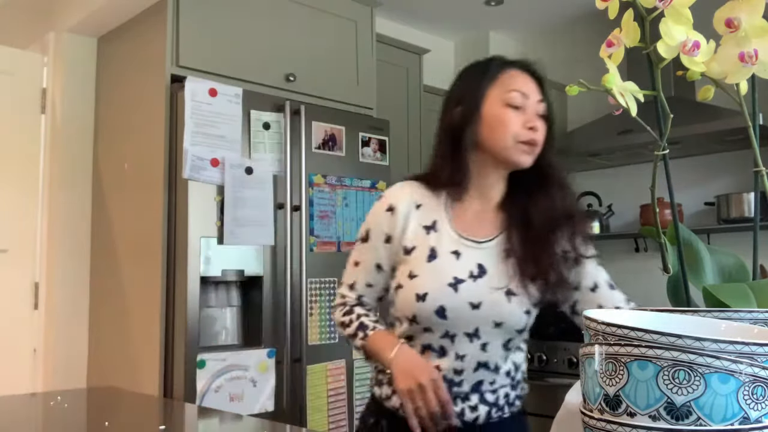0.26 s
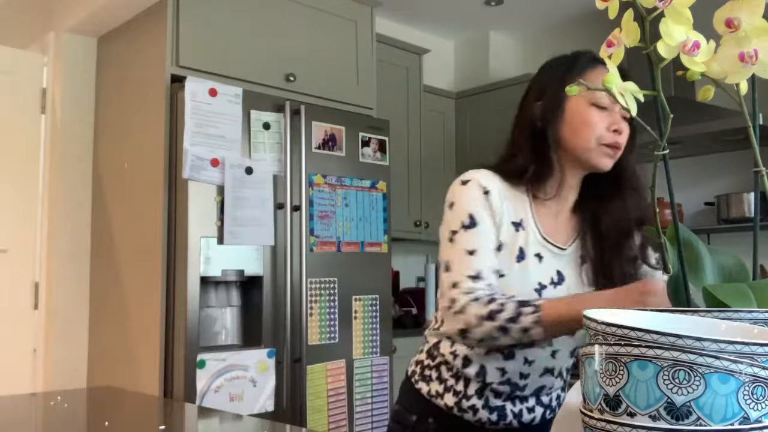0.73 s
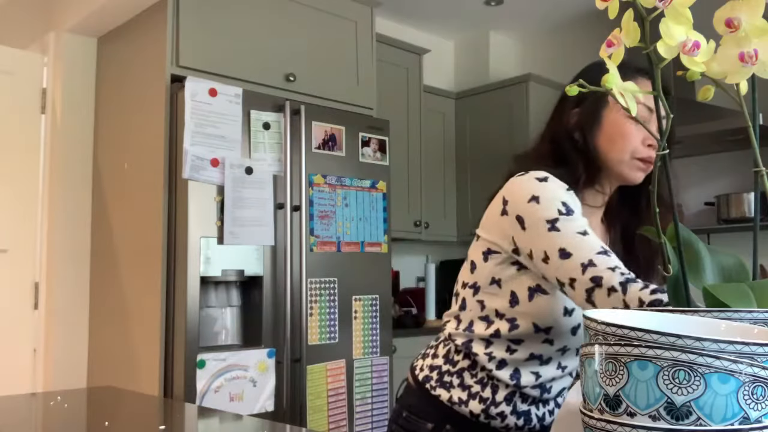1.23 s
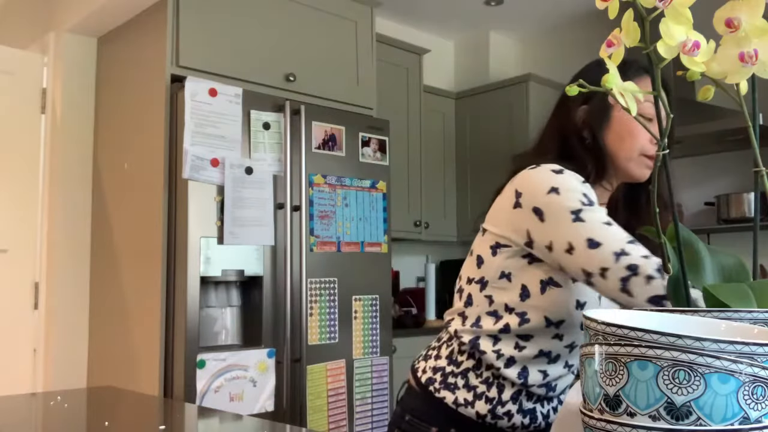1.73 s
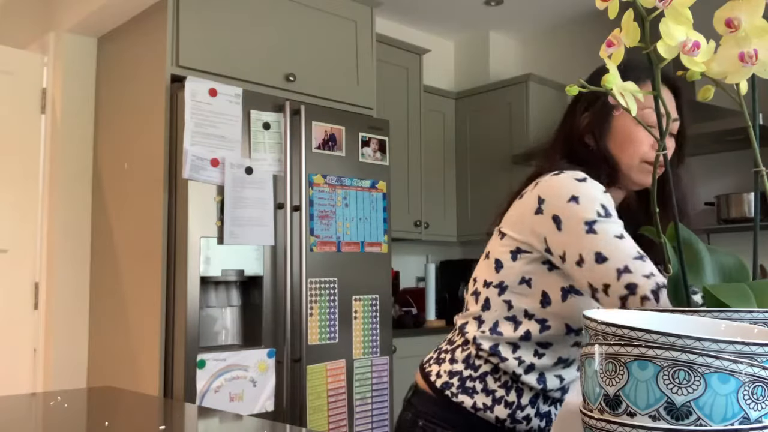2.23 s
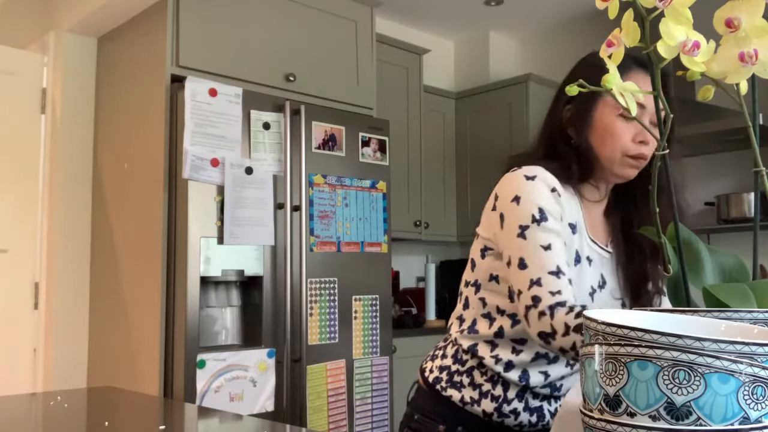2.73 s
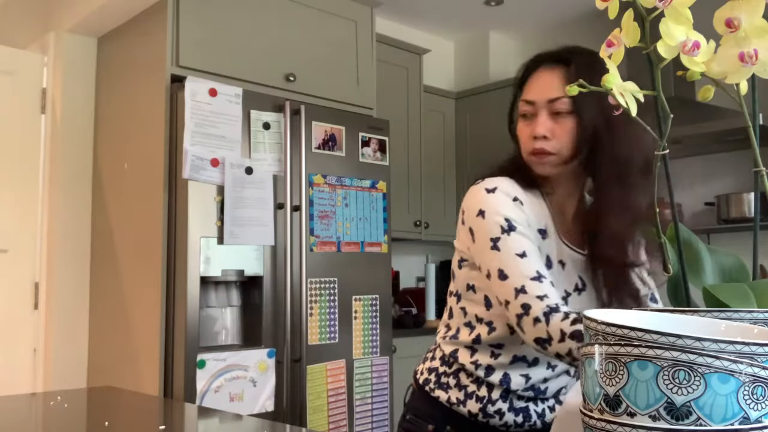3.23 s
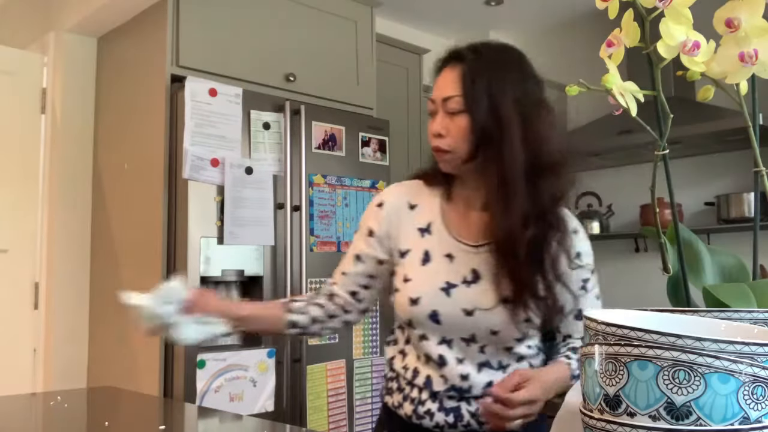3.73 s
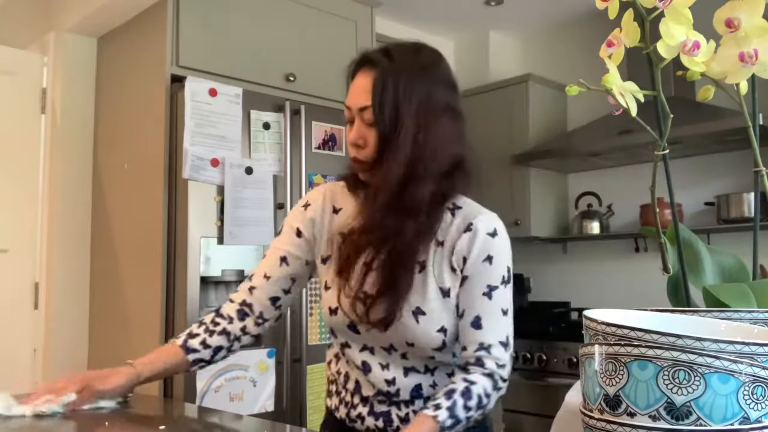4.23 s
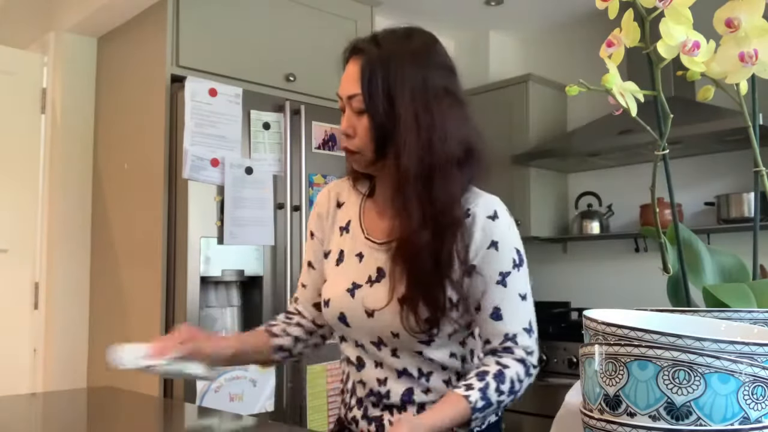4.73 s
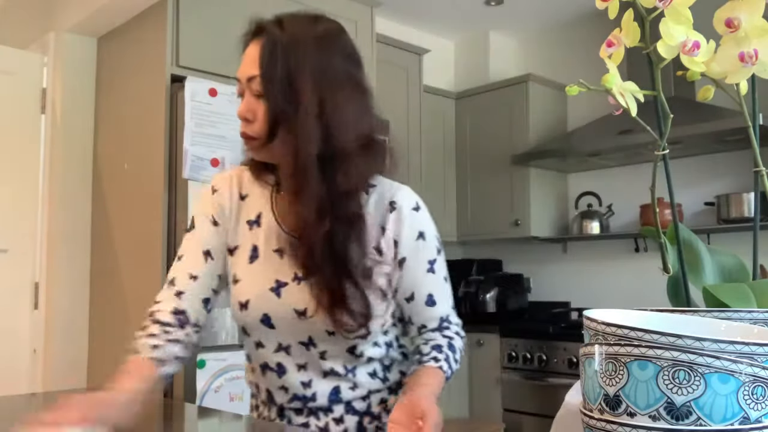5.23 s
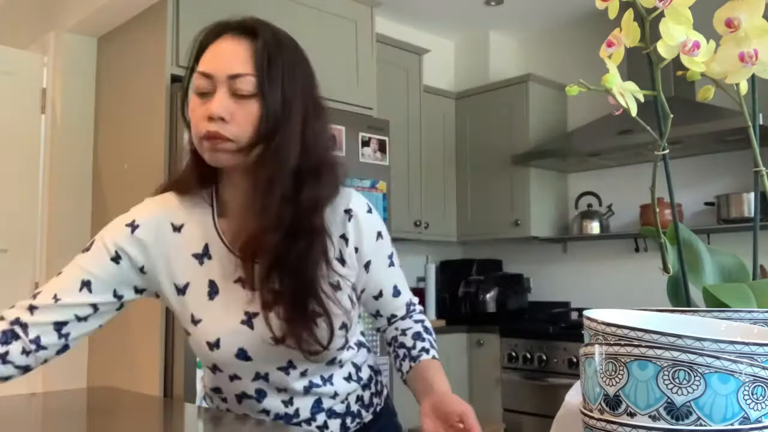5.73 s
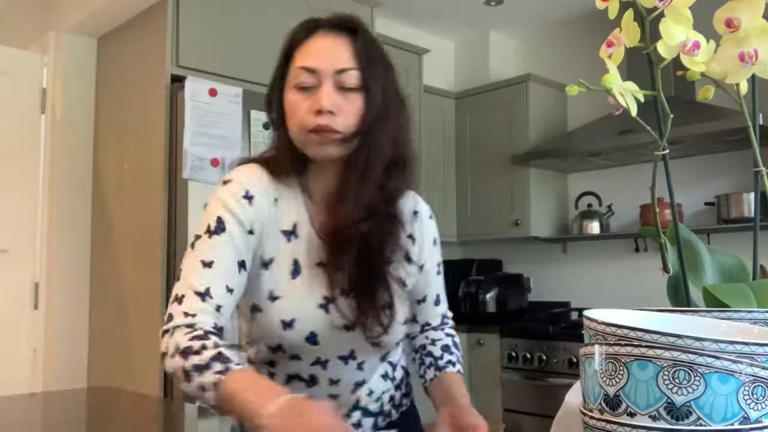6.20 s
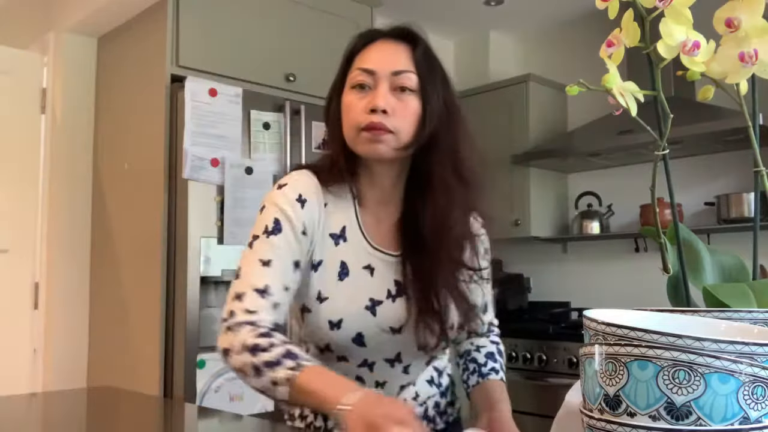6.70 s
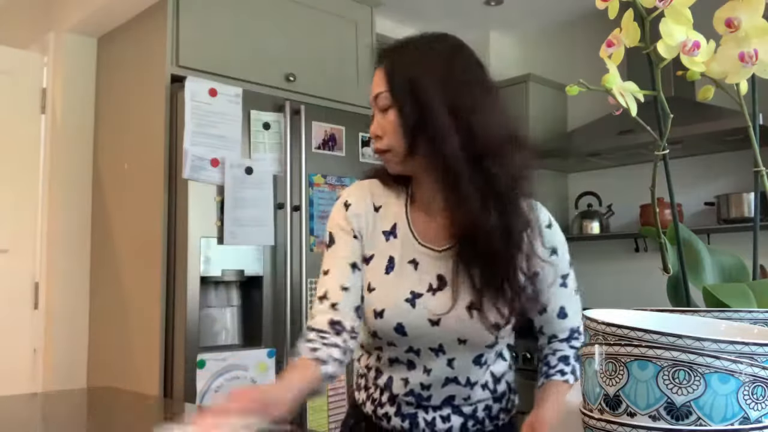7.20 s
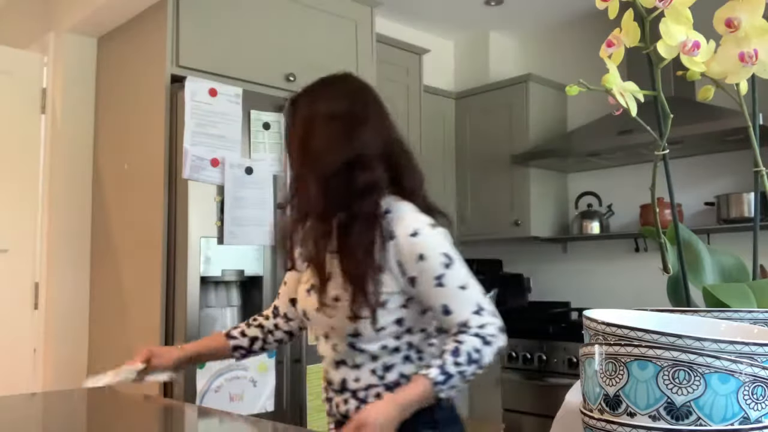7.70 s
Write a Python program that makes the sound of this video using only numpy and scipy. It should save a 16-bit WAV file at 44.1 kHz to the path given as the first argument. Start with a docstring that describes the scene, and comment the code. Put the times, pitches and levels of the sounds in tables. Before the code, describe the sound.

Rattling box knocks in a hard kitchen, a porcelain dish clanks and rings twice, then paper rustles, crunches and wipes across a worktop.

```python
"""A hard-walled kitchen, heard from a phone on the worktop, with a faint steady rush behind everything.
A box is shifted with rattling, booming knocks: noise bursts that leave clusters of close modes ringing.
A porcelain dish strikes twice and rings as a set of wavering sine partials. A hand rummages in paper,
pats a wad down and wipes it to and fro: filtered friction noise, with added snaps and crunches.
Dull taps, light clinks and deep furniture booms are short bands of noise at their own pitches."""
import sys
import numpy as np
from scipy import signal
from scipy.fft import rfft, irfft, next_fast_len
from scipy.io import wavfile
from scipy.ndimage import uniform_filter1d

SR = 44100
rng = np.random.default_rng(int(sys.argv[2]) if len(sys.argv) > 2 else 0)


def wrap_up_sound(samples):
    """Save the sound to the file named by the first command line argument, as 16-bit audio."""
    columns = np.atleast_2d(samples).T
    # keep every value between -1 and 1, then stretch to whole-number steps
    tamed = np.clip(columns, -1, 1)
    steps = np.round(tamed * 32767).astype(np.int16)
    wavfile.write(sys.argv[1], SR, steps)


N = 350574  # length of the scene in samples
T = np.arange(N) / SR  # time in seconds


def undb(db):
    """Turn decibels into a gain."""
    return 10 ** (np.asarray(db) / 20)


def unit(x):
    """Scale to an rms of 1."""
    return x / np.sqrt(np.mean(x ** 2))


def short_level(x, db):
    """Scale a short sound so that its energy, spread over 50 ms, has this rms level."""
    return x * undb(db) * np.sqrt(SR / 20 / np.sum(x ** 2))


def fade(t, t60):
    """Exponential decay that falls 60 dB in t60 seconds."""
    return np.exp(-np.log(1000) * t / t60)


def along(points, hz):
    """Read a curve of (Hz, value) points on a log-frequency axis."""
    f, value = np.transpose(points)
    return np.interp(np.log(np.maximum(hz, 1)), np.log(f), value)


def colour(x, points, size=2048):
    """Filter with the given (Hz, dB) curve, without any sound before its cause (minimum phase)."""
    log_gain = along(points, np.fft.rfftfreq(size, 1 / SR)) * np.log(10) / 20
    cepstrum = irfft(log_gain)
    # folding the cepstrum onto positive time makes the filter causal
    cepstrum[1:size // 2] *= 2
    cepstrum[size // 2 + 1:] = 0
    response = irfft(np.exp(rfft(cepstrum)))
    return signal.fftconvolve(x, response)[:len(x)]


def band(x, lo_hz, hi_hz, order=2):
    """Keep only the band between two frequencies (Butterworth)."""
    edges = [lo_hz, min(hi_hz, SR / 2 - 1)]
    return signal.sosfilt(signal.butter(order, edges, "band", fs=SR, output="sos"), x)


def walk(rate, count=N):
    """Random levels, a new one every 1 / rate seconds, smoothed twice and scaled to an rms of 1."""
    k = int(SR / rate)
    steps = np.repeat(rng.standard_normal(count // k + 1), k)
    return unit(uniform_filter1d(uniform_filter1d(steps, k), k)[:count])


def add(track, s, sound):
    """Mix a sound into a track at s seconds."""
    i = int(s * SR)
    track[..., i:i + sound.shape[-1]] += sound[..., :N - i]


def slips(count, spread_db):
    """Dense tiny clicks of either sign: most are faint, a few runs of 16 samples stand out."""
    run_db = spread_db * np.minimum(rng.exponential(size=count // 16 + 1), 5)
    sizes = np.repeat(undb(run_db), 16)
    return unit(rng.standard_normal(count) * sizes[:count])


def touch(thump_db, crisp_db, thump_hz=500, crisp_hz=7500):
    """Colour of one contact as (Hz, dB): soft ones thump, hard ones crack."""
    return [(thump_hz, thump_db), (2 * thump_hz, 0), (crisp_hz / 2, 0), (crisp_hz, crisp_db)]


def blow(db, thump_db, crisp_db, decay_s, spectrum, rise_s, spread_db):
    """A short shower of tiny contacts, coloured by the touch and by what is touched."""
    t = T[:SR // 4]
    shower = slips(len(t), spread_db) * (1 - np.exp(-t / rise_s)) ** 2 * np.exp(-t / decay_s)
    shower = colour(colour(shower, touch(thump_db, crisp_db)), spectrum)
    return short_level(shower, db)


# How wide the sound is. Each row: frequency in Hz, side minus mid in dB.
STEREO_WIDTH = [(100, -5.5), (250, -5), (500, 2), (1000, 2.5), (2500, 2.5), (6000, 3.5), (11000, -1)]
# How the sound leans between the ears. Each row: frequency in Hz, left minus right in dB.
LEFT_RIGHT_BALANCE = [(100, 1), (350, 2.5), (850, -1), (1800, -1.5), (3500, -0.5), (6500, 2.5),
                      (12000, 1.5)]


def microphones(mid, side):
    """Two close ports: more alike in the bass than higher up. Returns left and right."""
    side = colour(side, STEREO_WIDTH)
    channels = []
    for sign in (1, -1):
        lean = [(hz, sign * db / 2) for hz, db in LEFT_RIGHT_BALANCE]
        channels.append(colour(mid + sign * side, lean))
    return np.array(channels)


# How long the room rings. Each row: frequency in Hz, time to fall 60 dB in seconds.
ROOM_DECAY = [(100, 0.63), (400, 0.31), (1500, 0.5), (5000, 0.52), (9000, 0.44), (15000, 0.35)]


def kitchen(x, direct_db, gap_s):
    """Direct sound plus dense reflections that build up over gap_s and decay band by band."""
    t = T[:SR * 3 // 4]
    edges = np.geomspace(40, 20000, 10)
    hz = np.fft.rfftfreq(len(t), 1 / SR)
    noise = rfft(rng.standard_normal((2, len(t))))
    tail = 0
    for lo, hi in zip(edges, edges[1:]):
        t60 = along(ROOM_DECAY, np.sqrt(lo * hi))
        tail = tail + irfft(noise * (hz >= lo) * (hz < hi), len(t)) * fade(t, t60)
    response = unit(tail * (1 - np.exp(-t / gap_s))) / np.sqrt(len(t))
    response[0, 0] += undb(direct_db)  # the direct sound goes to the mid only
    mid, side = signal.fftconvolve(x[None], response, axes=1)[:, :N] / np.hypot(1, undb(direct_db))
    return microphones(mid, side)


# Colour of the quiet kitchen. Each row: frequency in Hz, level in dB.
ROOM_TONE_COLOUR = [(15, -32.5), (25, -2.5), (69, 2), (144, -9), (289, -9), (567, -24), (1140, -16.5),
                    (5140, -29), (6210, -24.5), (7300, -29), (11200, -27.5), (13900, -35.5), (15500, -45)]


def room_tone():
    """The faint steady rush of the kitchen: coloured noise, drawn separately for mid and side."""
    mid, side = (unit(colour(rng.standard_normal(N), ROOM_TONE_COLOUR)) for _ in range(2))
    return microphones(mid, side) * undb(-67.5)


# Heavier contacts that make the furniture boom. Each row: start in seconds, level in dB before the room.
FURNITURE_BOOMS = [(.17, -51.5), (.277, -50), (.64, -56), (1.103, -61.5), (2.054, -55), (2.306, -50),
                   (3.9, -56), (6.468, -57)]


def booms():
    """The deep, short resonance of the furniture under a heavy contact: a narrow band of noise."""
    boom_hz, width_hz, decay_s = 67.6, 15, .03
    out, t = np.zeros(N), T[:SR // 3]
    for s, db in FURNITURE_BOOMS:
        burst = rng.standard_normal(len(t)) * np.exp(-t / decay_s)
        boom = band(burst, boom_hz - width_hz / 2, boom_hz + width_hz / 2)
        add(out, s, short_level(boom, db))
    return kitchen(out, direct_db=7.5, gap_s=.002)


# Dull taps of the hand and of things it nudges.
# Each row: start in seconds, level in dB before the room, pitch in Hz.
DULL_TAPS = [(1.107, -55.5, 430), (1.643, -63, 1140), (2.312, -45.5, 706), (2.785, -44, 800),
             (2.857, -44, 820), (3.352, -50, 390), (4.19, -49, 865), (4.523, -54, 282), (5.523, -60, 350),
             (5.679, -52.5, 1420), (6.468, -41.5, 398), (6.488, -41.5, 920), (6.598, -52, 700),
             (6.65, -50, 540), (7.15, -61, 876), (7.19, -59.5, 780), (7.654, -54.5, 150)]


def taps(decay_s, spread):
    """Soft contacts: a short thud of noise about one pitch."""
    out, t = np.zeros(N), T[:SR // 8]
    for s, db, hz in DULL_TAPS:
        burst = rng.standard_normal(len(t)) * np.exp(-t / decay_s)
        thud = band(burst, hz / (1 + spread), hz * (1 + spread))
        add(out, s, short_level(thud, db))
    return kitchen(out, direct_db=2.0, gap_s=0.0018)


# Wrapped crockery touches lightly and rings on one muffled note.
# Each row: start in seconds, level in dB before decay and room, pitch in Hz.
CROCKERY_CLINKS = [(.994, -57, 1190), (1.525, -64.5, 2363), (1.642, -58, 1163), (1.778, -67, 1220)]


def clinks(width_hz, t60):
    """Light touches of crockery: a tight cluster about one pitch, soon damped by the paper."""
    out, t = np.zeros(N), T[:SR // 2]
    for s, db, hz in CROCKERY_CLINKS:
        cluster = unit(band(rng.standard_normal(len(t)), hz - width_hz / 2, hz + width_hz / 2))
        add(out, s, cluster * fade(t, t60) * undb(db))
    return kitchen(out, direct_db=7.5, gap_s=0.0025)


# Knocks on the box. Each row: start in seconds, level in dB before the final mix, thump in dB,
# crispness in dB, decay time in seconds, rattle over the level in dB.
BOX_KNOCKS = [(0.167, -30, 4.5, -2.5, 0.025, -13), (0.2743, -23, 1, -3, 0.0037, -4),
              (0.2797, -24.5, 2.5, 4.5, .003, -7), (0.3555, -25, 5, 0.5, 0.002, -2.5),
              (.408, -29, 1.5, -3, 0.0034, 1.5), (.446, -29.5, -3.5, -11.5, 0.005, -10),
              (1.104, -58, 10, -14, 0.0064, -20)]
# Colour of a knock on the box. Each row: frequency in Hz, level in dB.
BOX_COLOUR = [(29, -33.5), (50, -12.5), (290, -14), (434, -2), (800, -11), (1100, -8.5), (1740, -20),
              (2220, -11.5), (2500, -14.5), (5140, -15), (7190, -14.5), (10800, -13), (15500, -21.5)]
# What the box and its loose contents ring with. Each row: frequency in Hz, width in Hz,
# level over the rattle in dB, time to fall 60 dB in seconds.
BOX_RINGS = [(429, 38, -10.5, 0.42), (540, 110, -19.5, 0.22), (725, 130, -12, 0.19), (900, 60, -15.5, 0.24),
             (1032, 66, -10.5, 0.79), (1287, 50, -11, 0.38), (2198, 87, -5, 0.41), (2480, 78, -14, .3),
             (8270, 290, -4.5, 0.31), (11030, 600, 2.5, 0.39), (13800, 700, -9.5, .3)]


def box():
    """Knocks shake the box; its walls and loose contents ring on in clusters of close modes."""
    knocks, rings, t = np.zeros(N), np.zeros((2, N)), T[:SR * 3 // 4]
    for s, db, thump_db, crisp_db, decay_s, rattle_db in BOX_KNOCKS:
        add(knocks, s, blow(db, thump_db, crisp_db, decay_s, BOX_COLOUR, rise_s=0.0016, spread_db=2.0))
        for hz, width, mode_db, t60 in BOX_RINGS:
            lo, hi = hz - width / 2, hz + width / 2
            cluster = np.array([unit(band(rng.standard_normal(len(t)), lo, hi)) for _ in rings])
            # each touch colours the ringing too
            ring_db = db + rattle_db + mode_db + along(touch(thump_db, crisp_db), hz)
            add(rings, s, cluster * fade(t, t60) * undb(ring_db))
    knocks = colour(knocks, [(110, -6.5), (320, -1.5)])  # the box radiates little deep bass
    knocks = kitchen(knocks, direct_db=-2.0, gap_s=0.0028)
    return knocks * undb(1) + microphones(*rings) * undb(-2.0)


# The ringing notes of the dish. Each row: frequency in Hz, level in dB before wavering and mix,
# time to fall 60 dB in seconds, second blow over the first in dB, side minus mid in dB.
DISH_PARTIALS = [(1797, -34, .68, 2, 1), (1863, -38, .58, -2, 1), (2091, -24, .5, -1, 8),
                 (2943, -35, .38, 4, 4), (3051, -23.5, .41, 8, 2), (4485, -35, .46, 0, 1),
                 (4570, -28.5, .46, 4, 0), (5681, -13.5, .31, 12, -7), (6097, -23, .41, 6, -9),
                 (6739, -30, .38, -8, -2), (7203, -23, .36, 0, 6), (7295, -20.5, .36, 2, 6),
                 (7360, -31, .34, 0, 6), (8687, -32.5, .3, 0, 2), (9114, -34.5, .28, 4, 3),
                 (9962, -23, .31, -7, -3), (10490, -36, .3, -5, -3), (10660, -38, .28, -6, -3),
                 (11400, -37, .22, -4, -15), (11602, -35, .23, -2, -15), (13311, -29, .21, -10, -4),
                 (13396, -29.5, .21, -10, -4), (14930, -32, .27, -10, 9), (15110, -33, .28, -10, 9)]
# The dish bumps on the worktop; the first two bumps make it ring. Each row: start in seconds,
# level in dB before the final mix, thump in dB, crispness in dB, decay time in seconds.
DISH_BUMPS = [(2.052, -20, -5.5, -9, 0.01), (2.099, -23.5, -8.5, -4, 0.0019),
              (2.306, -40, 16, -12.5, 0.0036), (2.391, -51, 19, -13, 0.0092)]
# Colour of a bump on the worktop. Each row: frequency in Hz, level in dB.
WORKTOP_COLOUR = [(25, -33.5), (70, -9.5), (170, -10.5), (340, 0.5), (520, -2), (650, -0.5), (1050, -2),
                  (1500, -11.5), (2200, -7.5), (4000, -6.5), (5000, -8.5), (7000, -2.5), (10300, -8),
                  (11200, -30.5), (15500, -37)]


def dish(swell_s, sway_db, sway_rate, waver_db, waver_rate, linger_db, linger_t60):
    """Porcelain struck twice: partials build up in the room, waver with its reflections, and linger."""
    level_db, left_db, wander_rad = 3, 2.5, .3  # left_db is left over right
    ring, bumps, t = np.zeros((2, N)), np.zeros(N), T[:SR]
    start = DISH_BUMPS[0][0]
    ages = [np.maximum(t - (s - start), 0) for s, *_ in DISH_BUMPS[:2]]
    for hz, db, t60, second_db, side_db in DISH_PARTIALS:
        swells = []
        for age in ages:
            decay = undb(-60 * age / t60)
            linger = undb(linger_db - 60 * age / linger_t60)
            swells.append((1 - np.exp(-age / swell_s)) * np.hypot(decay, linger))
        first, second = swells
        envelope = np.hypot(first, undb(second_db) * second)
        envelope = envelope / envelope.max() * undb(db) / np.hypot(1, undb(side_db))
        # each partial swells and sinks irregularly, independently of the others
        envelope = envelope * undb(sway_db * np.tanh(walk(sway_rate, len(t))))
        phase = 2 * np.pi * (hz * t + rng.random())
        # mid and side lie about a quarter turn apart, so each partial sounds wide
        for track, gain, turn in zip(ring, (1, undb(side_db)), (0, np.pi / 2)):
            wave = np.sin(phase + turn + wander_rad * walk(waver_rate, len(t)))
            waver = undb(waver_db * np.tanh(walk(waver_rate, len(t))))
            add(track, start, gain * envelope * waver * wave)
    for s, *stroke in DISH_BUMPS:
        add(bumps, s, blow(*stroke, WORKTOP_COLOUR, rise_s=0.00099, spread_db=0.0))
    mid, side = ring
    left = (mid + side) * undb(level_db + left_db / 2)
    right = (mid - side) * undb(level_db - left_db / 2)
    return np.array([left, right]) + kitchen(bumps, direct_db=-5.5, gap_s=0.0027) * undb(-3)


# The hand rummages in the packing paper. Each row: start in seconds, length before the release in
# seconds, level in dB before colour and room, weight (rumble over level) in dB,
# crispness (hiss over level) in dB.
PAPER_RUMMAGES = [(0, 0.0089, -50, -15, -24), (0.603, 0.11, -48.5, -1, -6.5),
                  (0.726, 0.1, -55.5, -28, -4.5), (0.916, 0.16, -64, -6.5, -3.5),
                  (1.109, 0.064, -54.5, -0.5, -11.5), (1.21, 0.086, -63.5, -25, -13),
                  (1.48, .17, -76.5, 0, -1), (1.75, 0.048, -75.5, -3, 7), (2.36, 0.36, -48, 0.5, -6),
                  (2.709, 0.15, -45, -7, -4.5), (2.961, 0.22, -46.5, -3.5, -4.5),
                  (3.225, 0.1, -46.5, -15, -3.5), (3.311, 0.15, -51, -6.5, -1),
                  (3.516, 0.57, -61.5, -12.5, -3)]
# The wad is wiped over the worktop, one row a sweep. Each row: start in seconds, length before the
# release in seconds, level in dB before colour and room, weight in dB, crispness in dB.
WAD_WIPES = [(3.875, 0.22, -45.5, -8, -1), (4.11, 0.31, -48, -13, -4), (4.362, 0.064, -40, -20, -5.5),
             (4.462, 0.064, -49, -1, -1.5), (4.56, 0.24, -61, -29, -6.5), (4.765, 0.11, -55, -10.5, 2.5),
             (4.826, 0.18, -51, -8, -7.5), (5.038, 0.18, -47.5, -44, 3), (5.21, 0.11, -52.5, -30, 0.5),
             (5.344, 0.32, -56.5, -5, -0.5), (5.67, 0.31, -55, -36, 3), (5.952, 0.14, -56, -7, 1),
             (6.106, 0.18, -51, -19, -2.5), (6.3, 0.14, -55, -17, 2.5), (6.554, 0.17, -51.5, 2, 1.5),
             (6.708, 0.25, -56, -12.5, 2), (6.998, 0.14, -57.5, -12.5, 2.5), (7.106, 0.14, -53, -12, 3),
             (7.23, 0.16, -64.5, -13, 8.5), (7.413, 0.17, -55.5, -40, 4.5), (7.588, 0.07, -49, -8, -6),
             (7.792, 0.091, -53, -39, -8.5)]


def strokes():
    """Each move of the hand swells, holds and dies away. Returns rumble, rasp and hiss in dB."""
    attack_s, release_s = 0.05, .035  # the hand speeds up, holds, then slides to rest
    sag_db_per_s = 0.5  # the paper flattens under the hand and quietens
    power = np.full((3, N), 1e-10)
    age = T[:SR]
    for s, length_s, db, weight_db, crisp_db in PAPER_RUMMAGES + WAD_WIPES:
        swell = np.sin(np.pi / 2 * np.minimum(age / attack_s, 1))
        speed = swell * np.exp(-np.maximum(age - length_s, 0) / release_s)
        gains = undb(db + np.array([weight_db, 0, crisp_db]))
        add(power, s, np.outer(gains, speed * undb(-sag_db_per_s * age)) ** 2)
    return 10 * np.log10(power)


def crinkles(rasp_db, rate, lo_hz, hi_hz, cycles, spread_db):
    """Single creases snap at random moments, each ringing a few cycles at its own pitch."""
    out, t = np.zeros(N), T[:SR // 50]
    for when, pitch, size in rng.random((int(rate * N / SR), 3)):
        hz = lo_hz * (hi_hz / lo_hz) ** pitch
        snap = np.sin(2 * np.pi * hz * t) * np.exp(-hz * t / cycles)
        # a snap is as loud as the hand's rasp at that moment, plus a random extra
        add(out, when * N / SR, snap * undb(rasp_db[int(when * N)] + spread_db * size ** 2))
    return out


# Colour of rubbed paper. Each row: frequency in Hz, level in dB.
RUBBED_PAPER_COLOUR = [(70, 8), (110, 5), (170, 17), (270, 15.5), (400, 16), (680, 10), (1050, 11),
                       (2000, 8), (4000, 3.5), (6000, 2.5), (9000, 2.5), (13000, 5), (15000, -10.5)]
# The wad is pressed or snatched and its creases buckle; the first row is a brief hissing rustle of the sleeve.
# # Each row: start in seconds, level in dB before the final mix, thump in dB, crispness in dB, decay time in
# seconds.
WAD_CRUNCHES = [(.919, -64.5, -19, 23, 0.0067), (2.789, -43, 3, 3, 0.0059), (2.857, -46.5, 5, 3, 0.0085),
                (3.03, -51, 10, -3, .015), (3.252, -51.5, 14, 2, 0.024), (3.351, -53.5, 22, 3, 0.011),
                (3.642, -62, -11, 24, 0.017), (3.785, -65, -7, 7, .004), (3.885, -49.5, 16, -7, 0.0094),
                (3.913, -42, 3, 2, 0.017), (3.939, -41.5, 3.5, -5, 0.011), (4.028, -40, -5, -3, 0.01),
                (4.889, -41.5, -2, 0.5, 0.0054), (5.421, -52, -12, 8, 0.013), (5.518, -42, 0.5, 2, 0.021),
                (6.25, -50.5, 1.5, 1, 0.02), (6.430, -49, 0, 3, 0.021), (6.465, -36.5, 5, 5, 0.011),
                (6.488, -37.5, 7, -3, 0.0023), (6.591, -48, 12, 11, 0.056), (6.647, -56, 17, 7, 0.022),
                (7.653, -56.5, 8, 2, .007)]
# Colour of a wad of paper pressed on the worktop. Each row: frequency in Hz, level in dB.
WAD_COLOUR = [(50, -10), (100, -13.5), (170, -3.5), (280, -1), (400, 2.5), (600, -3.5), (1050, 5),
              (1500, -4), (2200, -1), (4000, -3), (7000, -9.5), (13000, -8), (15500, -27)]


def paper(patchy_db, patch_rate, flutter_db):
    """Fibres stick and slip under the hand; each size of crease catches and lets go in its own time."""
    levels = strokes()
    size = next_fast_len(N)
    friction = rfft(slips(N, spread_db=2.5) * undb(flutter_db * walk(40)), size)
    # split the friction into 20 overlapping bands, one for each size of crease
    centres = np.geomspace(70, 15000, 20)
    hz = np.fft.rfftfreq(size, 1 / SR)
    position = np.interp(hz, np.r_[0, centres], np.arange(-1, len(centres)))
    rustle = np.zeros(N)
    for k, centre in enumerate(centres):
        creases = irfft(friction * np.maximum(1 - np.abs(position - k), 0), size)[:N]
        # rumble, rasp and hiss each rule their own range and blend in between
        place = along([(400, 0), (1000, 0.79), (3300, 1.1), (7500, 2)], centre)
        shares = np.maximum(1 - np.abs(place - np.arange(3)), 0)
        patches_db = patchy_db * walk(patch_rate)
        rustle += creases * undb(shares @ levels + along(RUBBED_PAPER_COLOUR, centre) + patches_db)
    snaps = crinkles(levels[1], rate=140, lo_hz=686, hi_hz=7000, cycles=1.7, spread_db=12.0)
    rustle += snaps * undb(-2.5)
    crunches = np.zeros(N)
    for s, *stroke in WAD_CRUNCHES:
        add(crunches, s, blow(*stroke, WAD_COLOUR, rise_s=0.002, spread_db=4))
    return kitchen(rustle + crunches * undb(2.5), direct_db=1.0, gap_s=0.0013)


def scene():
    """Room, box, dish and paper together in the one kitchen."""
    background = room_tone() + booms()
    touches = taps(decay_s=0.01, spread=0.39) + clinks(width_hz=110, t60=.2)
    porcelain = dish(swell_s=0.077, sway_db=3.0, sway_rate=28, waver_db=3.5, waver_rate=75,
                     linger_db=-21.5, linger_t60=.55)
    hand = paper(patchy_db=2.5, patch_rate=22, flutter_db=1.5)
    return background + touches + box() + porcelain + hand


def record(dry):
    """The phone has a narrow dip in the treble and cuts the top."""
    # each pair: frequency in Hz, level in dB
    dip = [(6300, -1.5), (7000, -3.5), (7400, -7), (7900, -3.0), (8300, 1.0), (9500, -2.0)]
    heard = np.array([colour(channel, dip) for channel in dry])
    top_hz = 15300
    return signal.sosfilt(signal.ellip(8, .2, 70, top_hz, fs=SR, output="sos"), heard)


dry = scene()
out = record(dry)
wrap_up_sound(out)
```